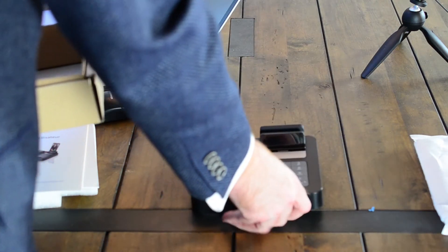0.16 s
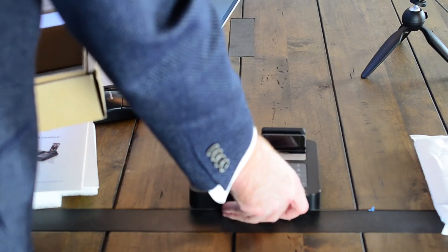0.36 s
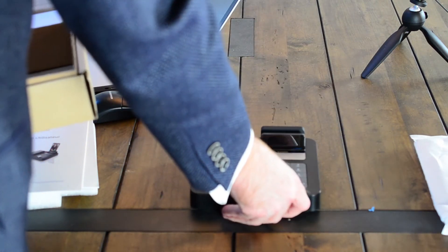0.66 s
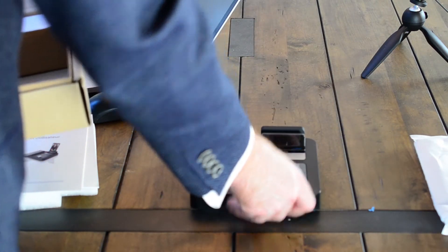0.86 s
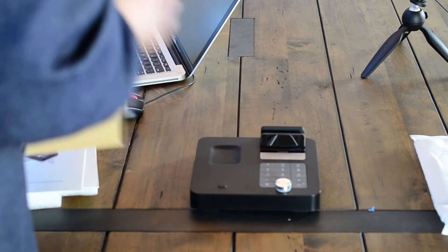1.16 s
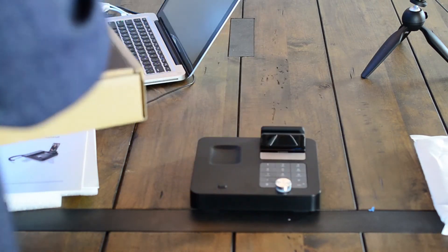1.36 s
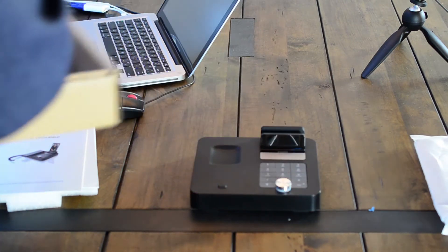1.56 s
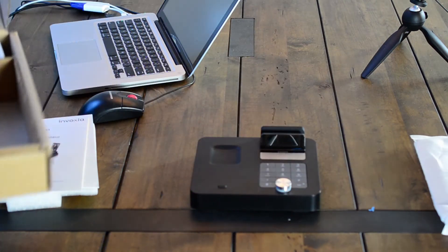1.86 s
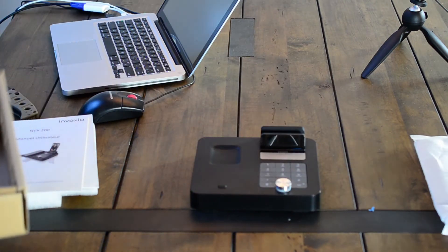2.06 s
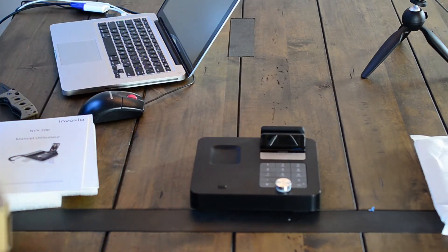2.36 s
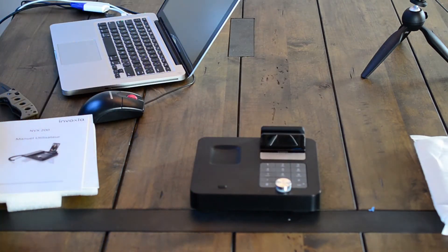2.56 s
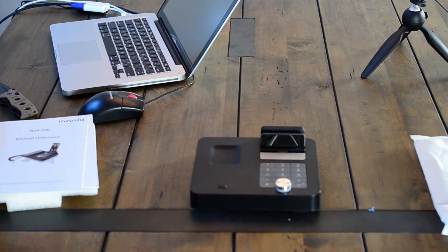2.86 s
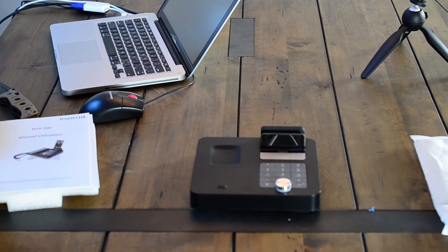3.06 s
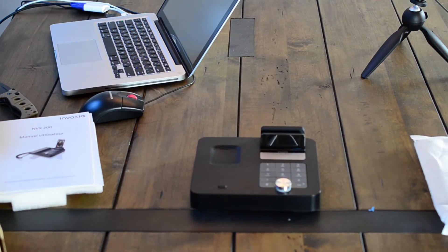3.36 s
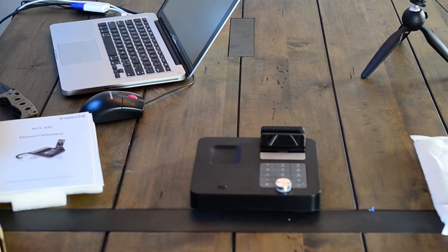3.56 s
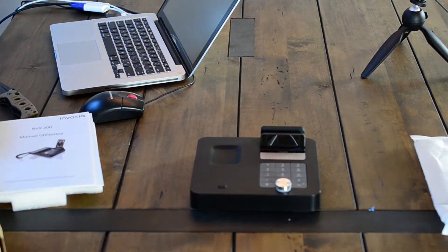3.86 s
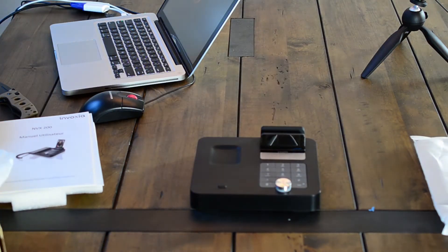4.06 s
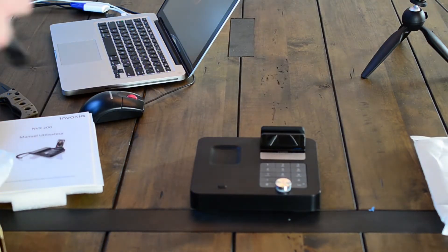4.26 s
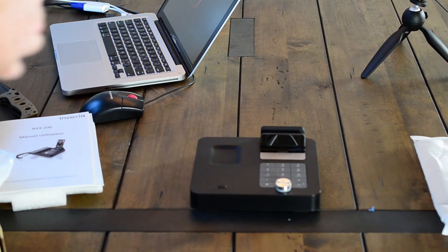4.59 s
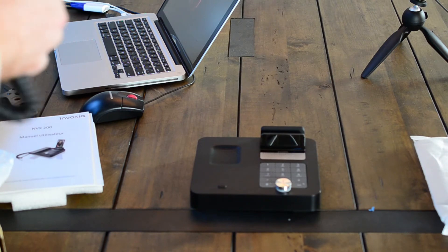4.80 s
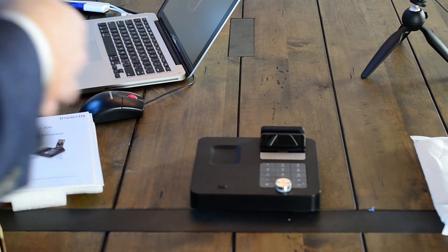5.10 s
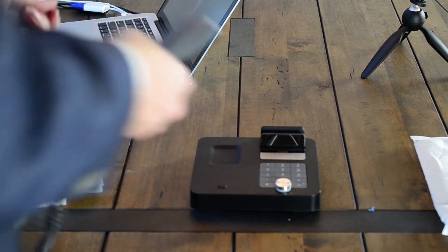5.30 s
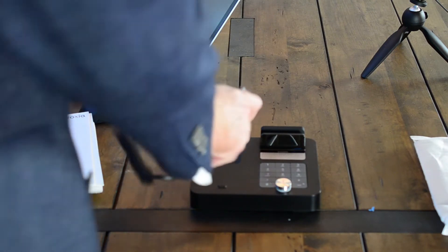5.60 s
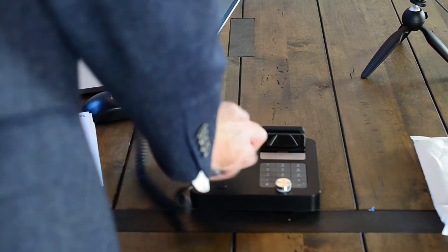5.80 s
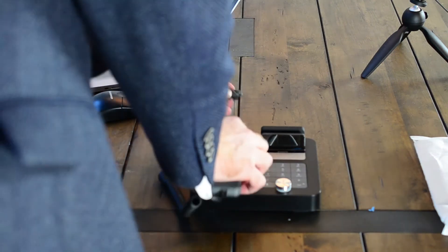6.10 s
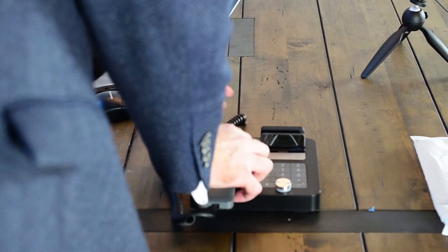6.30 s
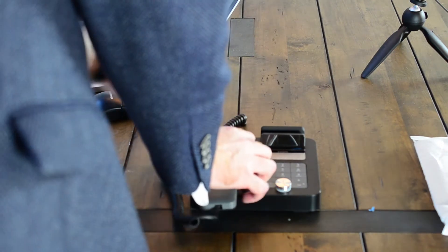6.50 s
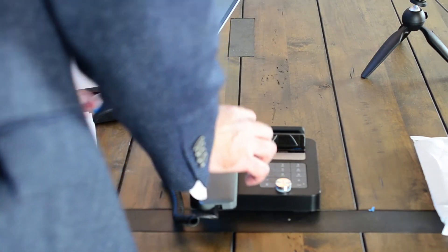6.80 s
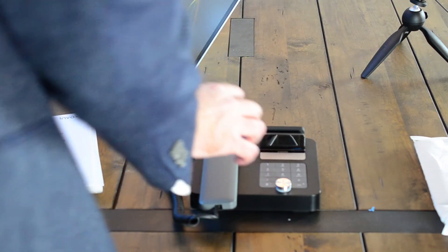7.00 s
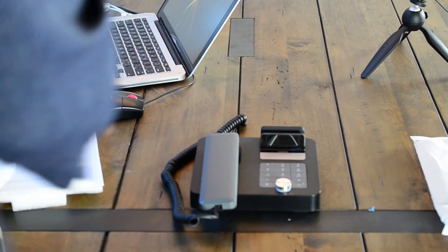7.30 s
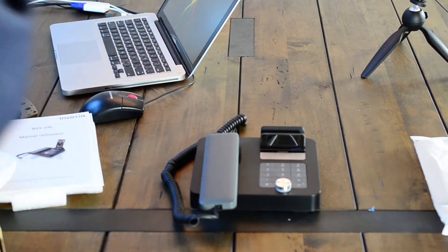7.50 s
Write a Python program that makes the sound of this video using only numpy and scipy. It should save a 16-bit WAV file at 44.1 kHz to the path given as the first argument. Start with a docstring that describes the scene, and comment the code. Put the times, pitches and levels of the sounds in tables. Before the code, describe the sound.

A plastic device thuds twice onto a wooden table, a cardboard box bumps and scrapes away, tissue rustles, then a handset clacks into its cradle.

```python
"""A bare room with a wooden table: a plastic device is seated twice, its cardboard box is carried off,
bumping and scraping, packing tissue rustles, and a handset clacks into its cradle; hum and air lie below.
Contacts are noise cracks through a body colour, with damped sines for ringing parts and table thump.
Rough noise is random slips on hiss, short gritty bands slide in pitch, and the tissue is hiss opened
in handfuls. Noise tails answer for the room; the hum is a wavering sine between two low noise bands."""
import sys
import numpy as np
from scipy import signal
from scipy.fft import rfft, irfft, next_fast_len
from scipy.io import wavfile
from scipy.ndimage import uniform_filter1d, map_coordinates

SR = 44100
rng = np.random.default_rng(int(sys.argv[2]) if len(sys.argv) > 2 else 0)


def wav_out(sig):
    """Save sig, one row per channel (or a flat mono array), as 16-bit PCM at SR to the path in sys.argv[1]."""
    wavfile.write(sys.argv[1], SR, np.round(np.clip(np.atleast_2d(sig).T, -1, 1) * 32767).astype(np.int16))


N = 337363

# Colour of the still air. Each row: frequency in Hz, level in dB per Hz.
AIR_COLOUR = [(15, -36), (25, -7), (53, -3.5), (96, 1.5), (198, -1), (281, -5), (665, -24.5), (1270, -24),
              (1530, -17.5), (1750, -20), (2420, -27), (3820, -33.5), (6540, -42.5), (10300, -64),
              (15500, -55.5)]
# Hum and the two low bands over time. Each row: time in seconds, hum dB, upper band dB, lower band dB.
HUM_LEVELS = [(0, -63.5, -65, -65), (.9, -61.5, -80, -60), (1.3, -74, -88, -76), (1.85, -62.5, -80.5, -83),
              (3.0, -61.5, -83, -68), (3.9, -64.5, -93.5, -88.5), (4.2, -68.5, -77.5, -71.5),
              (4.6, -79.5, -76.5, -80), (5.9, -70.5, -80, -74), (6.3, -69, -56.5, -81),
              (6.9, -67, -68.5, -69.5), (7.65, -74, -70.5, -83)]
# The low bands, upper first. Each row: centre in Hz, width in Hz.
LOW_BANDS = [(189.6, 21), (58.4, 25)]
# How long the room rings. Each row: frequency in Hz, time to fall 60 dB in seconds.
ROOM_DECAY = [(100, 0.71), (500, 0.63), (1500, 0.47), (4000, 0.45), (10000, 0.36)]

# Low and high rough noise: scraping, and the wash that lingers after knocks.
# Each row: time in seconds, low level in dB, high level in dB.
ROUGH_LEVELS = [(0, -49.5, -69), (.2, -80.5, -82.5), (.75, -57.5, -77.5), (1.2, -78, -69.5),
                (1.42, -72, -76), (1.58, -63, -65.5), (1.96, -63.5, -69), (2.4, -61, -67), (2.7, -75, -72),
                (3.05, -64.5, -64.5), (3.16, -56, -70), (3.38, -83.5, -80.5), (3.6, -76.5, -74),
                (4.09, -72, -75.5), (4.1, -82, -90), (5.0, -81.5, -81.5), (5.2, -70, -73),
                (5.55, -73.5, -72), (5.9, -65, -65.5), (6.17, -48, -54.5), (6.36, -57.5, -70),
                (6.5, -61.5, -66), (6.82, -75, -81.5), (7.65, -77, -72.5)]
# Hiss of cloth sleeves. Each row: time in seconds, level in dB.
SLEEVE_LEVELS = [(0, -106), (1.4, -86.5), (3.3, -92), (4.09, -81.5), (4.1, -94), (5.1, -94.5), (5.9, -79),
                 (6.4, -85.5), (7.0, -93.5), (7.55, -89), (7.65, -73)]
# Handfuls of tissue. Each row: start in seconds, length in seconds, swell in seconds, fade in seconds, level in dB.
TISSUE_HANDFULS = [(1.493, .14, 0.0086, 0.015, -75.5), (1.597, 0.19, .03, .03, -87),
                   (1.77, 0.12, 0.045, 0.034, -73.5), (1.88, 0.15, .04, .1, -85),
                   (2.082, 0.25, .07, .06, -76.5), (2.272, 0.26, .07, 0.14, -71),
                   (2.46, 0.22, 0.04, 0.11, -68.5), (2.644, .2, 0.071, 0.076, -74.5),
                   (2.8, 0.15, 0.029, 0.046, -78.5), (2.935, 0.25, .02, .1, -77),
                   (3.123, 0.097, 0.034, .012, -74.5), (3.21, .13, 0.043, .06, -82),
                   (3.557, 0.22, 0.075, .06, -83.5), (3.767, 0.15, 0.094, 0.054, -72.5),
                   (3.899, 0.19, 0.044, .004, -72.5)]
# Colours of the rough noise and the tissue. Each row: frequency in Hz, level in dB per Hz.
LOW_ROUGH_COLOUR = [(120, -28), (250, 0), (500, 3), (800, 2.5), (1200, -4.5), (2000, -66)]
HIGH_ROUGH_COLOUR = [(600, -23), (1200, -1), (1700, -1.5), (2600, -6), (3200, -12.5), (3800, -8.5),
                     (5000, -24), (8000, -43)]
TISSUE_COLOUR = [(1760, -48), (3000, -4), (3710, -0.5), (6690, -11), (9630, -14.5), (13400, -20.5),
                 (15500, -21.5)]
# Short gritty noise bands: drags, and brief bursts of colour at some hits. Each row: start in seconds,
# length in seconds, first pitch in Hz, last pitch in Hz, width in Hz, level in dB before shaping.
GRITTY_BANDS = [(0.0, 0.13, 700, 694, 200, -57), (0.161, 0.082, 703, 683, 300, -60),
                (0.597, 0.037, 1300, 1296, 1110, -55), (1.096, 0.056, 2400, 2380, 500, -63.5),
                (1.099, 0.014, 700, 730, 296, -49.5), (1.419, .009, 4700, 4630, 1200, -55),
                (1.493, 0.11, 2500, 2385, 900, -62.5), (1.493, 0.16, 1700, 1620, 400, -66),
                (1.79, 0.097, 1900, 1794, 805, -61), (1.791, .12, 3900, 3810, 715, -69.5),
                (2.17, 0.28, 1500, 1274, 610, -62.5), (2.485, 0.064, 900, 793, 690, -55.5),
                (2.588, 0.035, 700, 680, 600, -58.5), (3.124, .1, 1700, 2310, 890, -59),
                (3.626, 0.12, 3400, 2920, 2600, -68.5), (3.8, 0.14, 2400, 2736, 1100, -67.5),
                (3.951, .15, 2300, 2706, 1100, -68), (5.04, 0.15, 4140, 3840, 3000, -78.5),
                (6.087, 0.039, 2990, 2570, 2490, -75)]

# Contacts: small hard ticks, box bumps, device on table, handset in cradle. Each row: start in seconds,
# crack peak in dB, table thump in dB against the crack, treble share in dB, contact length in ms.
HARD_TICKS = [(1.4194, -42, -40, -25, 10.3), (4.1838, -67.5, -24.5, -6.5, 3.2),
              (4.4982, -52, -28.5, -11, 6.5), (4.5826, -65, -26, -3.5, 2.3),
              (4.6914, -57.5, -35, -20.5, 3.2), (5.4435, -49, -30, -15, 3.5)]
BOX_HITS = [(1.404, -47, -5.5, -33, 8), (1.536, -42, -10.5, -29, 8.1), (1.589, -45.5, -27, -46, 9.2),
            (1.625, -42.5, -16, -34, 4.8), (1.679, -56, -7, -14, 6.5), (1.727, -49, -18, -26, 2.9),
            (1.791, -55, -11, -28, 6.6), (1.829, -36, -24, -40, 3.6), (1.859, -45.5, -19, -10, 2.8),
            (1.935, -35, -22, -55, 6.5), (2.149, -44.5, -32, -9, 6), (2.3, -46.5, -15, -22, 8.4),
            (2.321, -52.5, -27, -19, 11), (2.514, -41.5, -12, -19, 11), (2.598, -43, -28, -32, 13.6),
            (2.712, -40.5, -24, -12, 3.6), (2.731, -37.5, -34, -24, 5.7), (2.811, -35.5, -18, -33.5, 14.6),
            (2.852, -50, -25, -22, 3.6), (2.934, -44, -4.5, -22, 4.9), (2.952, -34, -32, -19, 7.6),
            (3.09, -33.5, -25, -39.5, 5.5), (3.198, -34.5, -34, -22, 3.1), (3.239, -46, -31, -23, 3.6),
            (3.698, -53.5, -37, -6.5, 8.3), (3.871, -54, -17, -8, 6), (3.889, -53.5, -15, -27, 5),
            (5.036, -49.5, -17, -54, 5.1), (5.208, -47.5, -13.5, -38, 4.6), (5.238, -52, -13, -48, 4),
            (7.608, -36, -21, -63, 1.7)]
DEVICE_HITS = [(0.055, -57, -9, -30, 14), (0.157, -44.5, -28, -25.5, 4), (0.182, -63, -24, -24, 6),
               (0.239, -20, -4.5, -23, 6.9), (0.256, -28, -13, -28, 5.8), (0.634, -17.5, -10.5, -18, 7.2),
               (0.657, -26.5, -25, -33.5, 8.1), (0.697, -46, -22, -37, 15), (1.094, -42.5, -45, 1, 14)]
HANDSET_HITS = [(5.715, -40, -18, 4, 5), (5.737, -32.5, -40, -12, 12.7), (5.769, -39, -33, -27, 4.8),
                (5.943, -60, 1, 8, 4.5), (5.971, -15.5, -17.5, -15, 6.34), (6.081, -23, -28, -11.5, 6.7),
                (6.103, -25, -32, -18.5, 4.7), (6.136, -33.5, -23, -25, 5.4), (6.177, -26, -18, -15.5, 3.9),
                (6.272, -18.5, -26, -27.5, 7.8), (6.434, -39.5, -11, -36, 14),
                (6.472, -33, -31, -40.5, 8.2)]
# What each body radiates when struck. Each row: frequency in Hz, level in dB per Hz.
TICK_COLOUR = [(240, -35), (400, -8.5), (1160, -17.5), (1690, -2), (2360, -6), (2620, -13), (3770, -9),
               (5430, -20.5), (15000, -54)]
CARD_COLOUR = [(120, -35.5), (200, -3.5), (591, -1), (1200, -10), (1630, -12.5), (2900, -24), (3870, -29),
               (5170, -41.5), (13500, -52.5), (15000, -49.5)]
DEVICE_COLOUR = [(120, -18), (200, 4.5), (292, -2), (833, -7), (1150, -0.5), (1380, -6), (1690, -8),
                 (1910, -10), (4010, -26.5), (15000, -78)]
HANDSET_COLOUR = [(120, -20.5), (200, -14.5), (292, -10), (818, -2), (1380, -10.5), (1660, -4), (3410, -22),
                  (3800, -19), (4720, -30.5), (15000, -69.5)]
# Ringing heard with the contacts: the table, each body, and a bright ring that follows the ticks. Each row:
# frequency in Hz, level in dB, time to fall 60 dB in seconds.
TABLE_RING = [(92, -10.5, 0.37), (124, -6, 0.53), (153.2, -1.5, 0.24), (179.8, -6, 0.3), (223, -19.5, 0.36)]
TICK_RING = [(1704, -1, 0.045), (3843, -11, 0.049)]
CARD_RING = [(276, 1, 0.027), (485, 0.5, 0.14), (608, -1.5, 0.082), (887, -3, 0.036)]
DEVICE_RING = [(285, -11, 0.19), (379.5, -3.5, 0.14), (434, -4, 0.15), (514.5, 0, 0.15), (600, 3.5, 0.072),
               (843, -2.5, 0.15), (1030, -4, .07), (1130, -7.5, .12), (1670, 1, 0.03)]
HANDSET_RING = [(461, 1, 0.076), (547.3, -5.5, 0.35), (763, -16, 0.072), (1035, 1.5, 0.11),
                (1350, -5, 0.03), (1613, 0, 0.044), (2000, -12, 0.036)]

AIR_DB, HUM_HZ = -70, 131.9  # air level before it wanders, centre of the wavering hum
GRIT_DB = 6.5  # unevenness of the grit
SWELL_SHARE = 0.15  # part of a gritty band's length spent getting under way
BREAK_S = 4.097  # the echo of earlier gritty bands breaks off here
TOP_HZ = 15650  # upper frequency limit of the sound


def amp(db):
    """Gain of a level in dB."""
    return 10 ** (np.asarray(db) / 20)


def unit(x):
    """x at rms 1."""
    return x / np.sqrt(np.mean(x ** 2) + 1e-20)


def along(points, hz):
    """Read (Hz, value) points on a log frequency axis."""
    f, v = np.transpose(points)
    return np.interp(np.log(hz + 1), np.log(f + 1), v)


def curves(rows):
    """One value per sample for each column after the time."""
    s, *columns = np.transpose(rows)
    return [np.interp(np.arange(N) / SR, s, c) for c in columns]


def wobble(rate):
    """A smooth random curve with rate knots a second."""
    knots = rng.standard_normal(int(N * rate / SR) + 4)
    return map_coordinates(knots, [np.arange(N) * rate / SR])


def filtered(x, response):
    """x shaped by a response of frequency."""
    m = next_fast_len(N + SR // 2)
    return irfft(rfft(x, m) * response(np.fft.rfftfreq(m, 1 / SR)), m)[..., :N]


def coloured(x, colour):
    """x shaped by a colour table."""
    return filtered(x, lambda hz: amp(along(colour, hz)))


def causal(db):
    """Minimum-phase response with these levels: nothing sounds before its cause."""
    cepstrum = irfft(np.log(amp(db) + 1e-7))
    half = len(cepstrum) // 2
    cepstrum[1:half] *= 2
    cepstrum[half + 1:] = 0
    return np.exp(rfft(cepstrum))


def patchy(x, depth_db):
    """x with random patches of gain in time and pitch."""
    z = signal.stft(x, nperseg=512)[2]
    field = uniform_filter1d(rng.standard_normal(z.shape), size=8, axis=0)
    field = uniform_filter1d(field, size=9, axis=1)
    return signal.istft(z * amp(depth_db * unit(field)), nperseg=512)[1][:N]


def room_tail(gap_ms):
    """A fresh room answer of energy 1: noise in which each frequency dies at its own speed."""
    hz, t, z = signal.stft(rng.standard_normal(SR // 2 + SR // 5), SR, nperseg=256)
    decay = amp(-60 * t / along(ROOM_DECAY, hz)[:, None])
    x = signal.istft(z * decay, SR, nperseg=256)[1]
    x *= np.clip(np.arange(len(x)) / SR * 1000 / gap_ms, 0, 1) ** 2  # walls are metres away
    return x / np.linalg.norm(x)


def low_band(centre_hz, width_hz):
    """Noise through one broad resonance, heard as a fuzzy low band; rms 1."""
    noise = rng.standard_normal(N)
    return unit(filtered(noise, lambda hz: 1 / (1 + ((hz - centre_hz) / width_hz * 2) ** 2)))


def room_tone():
    """Still air as coloured noise, a hum wavering in pitch and level, and two fuzzy low bands."""
    air = amp(AIR_DB + 0.41 * wobble(0.72)) * unit(coloured(rng.standard_normal(N), AIR_COLOUR))
    hum_db, *band_levels = curves(HUM_LEVELS)
    phase = 2 * np.pi * np.cumsum(HUM_HZ + 1.4 * wobble(4.8)) / SR
    hum = amp(hum_db + 2.8 * wobble(5.8)) * np.sin(phase)
    bands = sum(amp(db) * low_band(*band) for db, band in zip(band_levels, LOW_BANDS))
    return air + hum + bands


def rough_noise(colour, slips, spread_db, smooth, flutter_db):
    """Tiny slips of uneven size (slips a second) on a smooth hiss, in clumps, with room; rms 1."""
    size = amp(spread_db * np.minimum(rng.exponential(1, N), 3))
    grains = (rng.random(N) < slips / SR) * rng.standard_normal(N) * size
    flutter = amp(flutter_db * (0.28 * wobble(24) + wobble(45)))
    source = (unit(grains) + smooth * rng.standard_normal(N)) * flutter
    near = coloured(patchy(source, depth_db=2.5), colour)
    return unit(near + amp(-2) * signal.fftconvolve(near, room_tail(gap_ms=16))[:N])


def handfuls():
    """Gain of the tissue: each handful swells, holds and fades."""
    t, gain = np.arange(N) / SR, np.zeros(N)
    for s, length, swell, fade, db in TISSUE_HANDFULS:
        gain += amp(db) * np.clip(np.minimum((t - s) / swell, (s + length - t) / fade), 0, 1)
    return gain


def gritty_bands():
    """Short gritty noise in sliding resonances: drags, and brief bursts of colour at some hits."""
    out = np.zeros(N + SR)
    for s, length, first_hz, last_hz, width_hz, db in GRITTY_BANDS:
        t = np.arange(round(length * SR)) / SR
        grit = rng.standard_normal((2, len(t)))
        grit *= amp(GRIT_DB * np.minimum(rng.exponential(1, len(t)), 3))
        smoother = [1, -np.exp(-np.pi * width_hz / SR)]
        slow = signal.lfilter([1], smoother, signal.lfilter([1], smoother, grit))
        # the two slow noises, on a sliding carrier, make a narrow band of noise
        turn = 2 * np.pi * np.cumsum(first_hz + (last_hz - first_hz) * t / length) / SR
        band = unit(slow[0] * np.cos(turn) + slow[1] * np.sin(turn))
        edges = np.minimum(t / (SWELL_SHARE * length), (length - t) / 0.0064)
        shape = np.minimum(1, edges) * amp(-4 * t / length)
        out[round(s * SR):][:len(t)] += amp(db) * shape * band
    out = out[:N] * amp(2 * wobble(35))
    early, room = np.arange(N) < BREAK_S * SR, room_tail(gap_ms=9.8)
    early_echo = early * signal.fftconvolve(out * early, room)[:N]
    late_echo = signal.fftconvolve(out * ~early, room)[:N]
    return out + amp(-10.0) * (early_echo + late_echo)


def handling():
    """Low and high rough noise, scraping and the wash after knocks; tissue and cloth share one hiss."""
    low_db, high_db = curves(ROUGH_LEVELS)
    cloth_db, = curves(SLEEVE_LEVELS)
    low = amp(low_db) * rough_noise(LOW_ROUGH_COLOUR, 260, 4.3, 0.64, flutter_db=1.1)
    high = amp(high_db) * rough_noise(HIGH_ROUGH_COLOUR, 350, 4, 1.2, flutter_db=2.6)
    crinkle = rough_noise(TISSUE_COLOUR, 1100, 2.2, 1.1, flutter_db=2.5)
    return low + high + gritty_bands() + (amp(cloth_db) + handfuls()) * crinkle


def ringing(modes, t):
    """One damped sine for each mode."""
    hz, db, t60 = np.transpose(modes)[:, :, None]
    return amp(db - 60 * t / t60) * np.sin(2 * np.pi * hz * t)


def struck(bank):
    """Sum of the modes, each with a chance strength and sign."""
    return (amp(rng.normal(0, 3, len(bank))) * rng.choice([-1, 1], len(bank))) @ bank


def contacts(events, body, modes, usual_treble_db, ring_db, wet_db):
    """Each contact: a short chatter through the body's colour, its modes, a table thump, and the room."""
    size = 2 ** 15
    out, t, hz = np.zeros(N + size), np.arange(size) / SR, np.fft.rfftfreq(size, 1 / SR)
    own = ringing(modes, t) * (1 - np.exp(-t / 0.0013))
    wood = ringing(TABLE_RING, t) * (1 - np.exp(-t / 0.0033))
    for s, db, thump_db, treble_db, ms in events:
        u = t * 1000 / max(ms, 1)  # time in contact lengths
        blow, settling = u * np.exp(-4 * u * u), 0.08 * np.exp(-u / 1.47)  # the parts settle after the blow
        chatter = rng.standard_normal(size) * (blow + settling)
        # a harder contact is brighter
        tilt_db = 0.33 * (treble_db - usual_treble_db) * np.log2(np.maximum(hz, 330) / 600)
        colour = causal(along(body, hz) + tilt_db)
        crack = irfft(rfft(chatter) * colour)
        crack /= np.abs(crack).max()
        # loose joints roughen the ring
        loose = amp(3.5 * np.interp(t * 120, np.arange(100), rng.standard_normal(100)))
        ring = amp(ring_db) * irfft(rfft(struck(own) * loose) * causal(tilt_db))
        thump = amp(thump_db) * struck(wood)
        # summed over all directions the crack is smooth in colour, and that is what the walls return
        all_round = unit(irfft(colour)) * np.sqrt(np.mean(crack ** 2))
        wet = irfft(rfft(all_round + ring) * rfft(room_tail(gap_ms=4.1), size))
        out[round(s * SR):][:size] += amp(db) * (crack + ring + thump + amp(wet_db) * wet)
    return out[:N]


def hard_ticks():
    """Small hard ticks, each followed by a strong, bright ring near 1.7 and 3.8 kHz."""
    return contacts(HARD_TICKS, TICK_COLOUR, TICK_RING, usual_treble_db=-9.5, ring_db=-1.5, wet_db=-4.5)


def box_bumps():
    """The cardboard box bumps: a dull body with short, low ringing."""
    return contacts(BOX_HITS, CARD_COLOUR, CARD_RING, usual_treble_db=-22.5, ring_db=-21, wet_db=-5.5)


def handset_in_cradle():
    """The handset's shell clacks into its cradle."""
    return contacts(HANDSET_HITS, HANDSET_COLOUR, HANDSET_RING,
                    usual_treble_db=-15.0, ring_db=-17.5, wet_db=-7.5)


def device_on_table():
    """The plastic device is seated on the wood, its body ringing with the table."""
    return contacts(DEVICE_HITS, DEVICE_COLOUR, DEVICE_RING,
                    usual_treble_db=-19.0, ring_db=-15.5, wet_db=-6.0)


def scene():
    """Everything at one microphone."""
    hits = hard_ticks() + box_bumps() + handset_in_cradle() + device_on_table()
    return (room_tone() + handling() + hits)[None]


def record(dry):
    """The small microphone loses the deepest bass; nothing is heard above the upper frequency limit."""
    def bass_cut_and_limit(hz):
        """Two equal bass cuts at 45 Hz, and silence from the upper limit on."""
        bass_cut = 1j * hz / 45 / (1 + 1j * hz / 45)
        return bass_cut ** 2 * (hz < TOP_HZ)
    return filtered(dry, bass_cut_and_limit)


dry = scene()
out = record(dry)
wav_out(out)
```